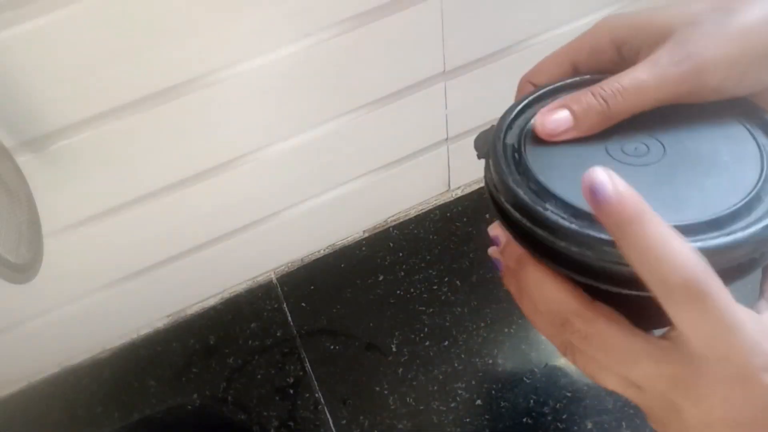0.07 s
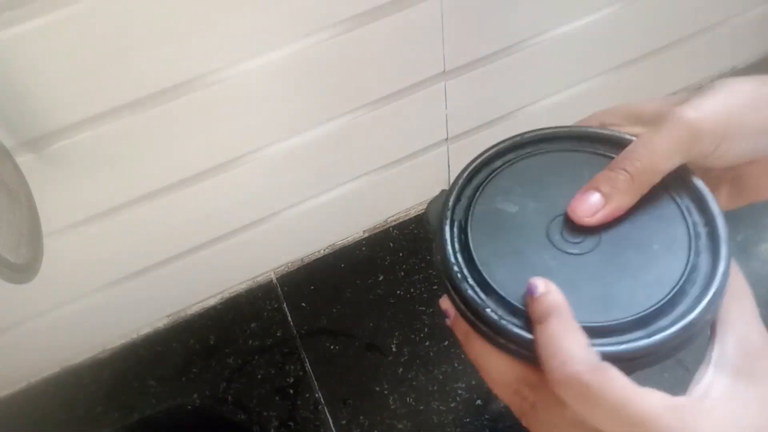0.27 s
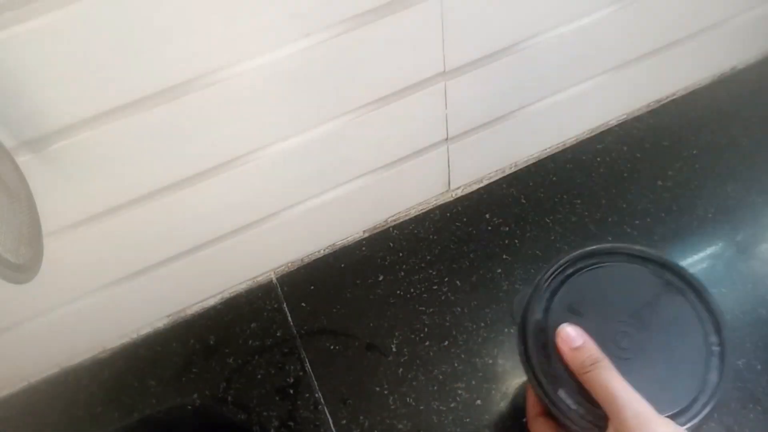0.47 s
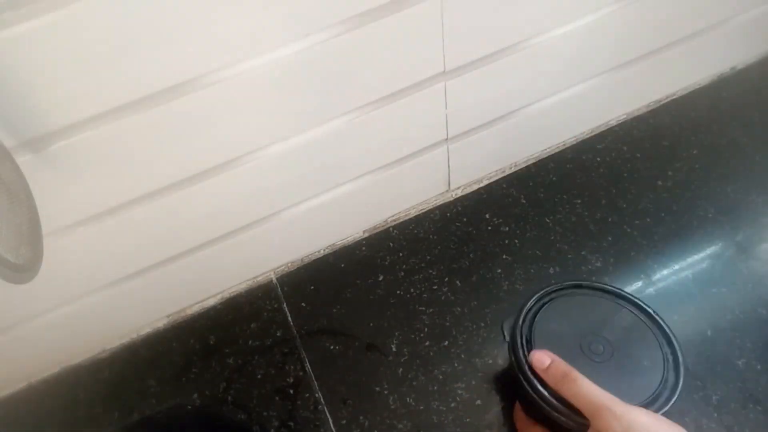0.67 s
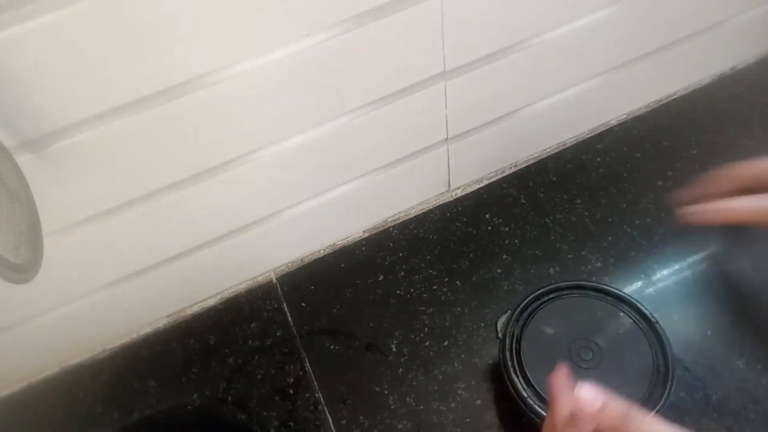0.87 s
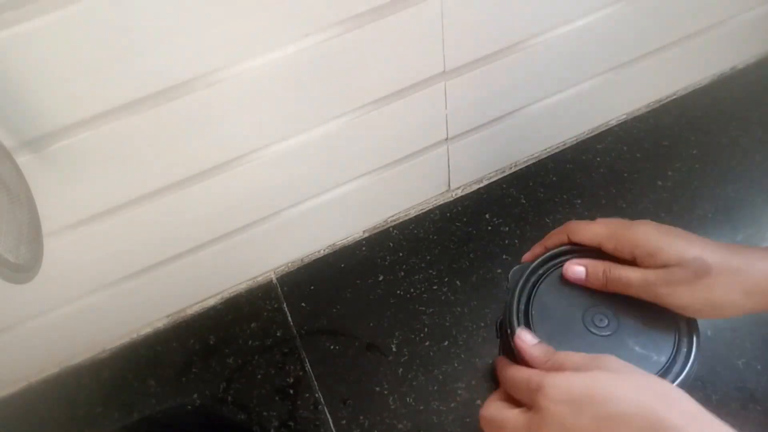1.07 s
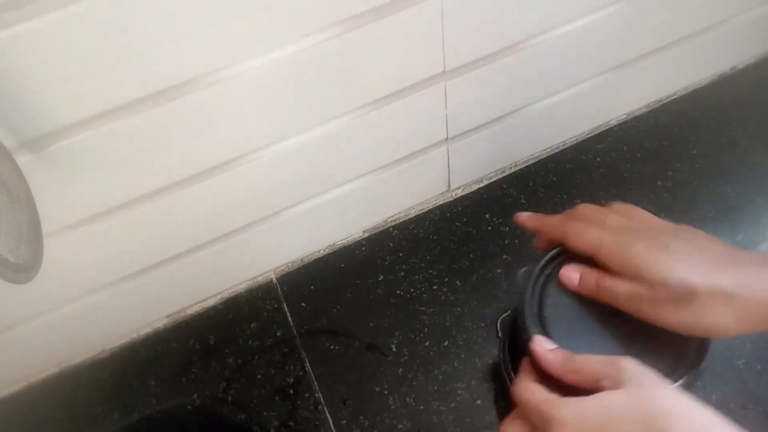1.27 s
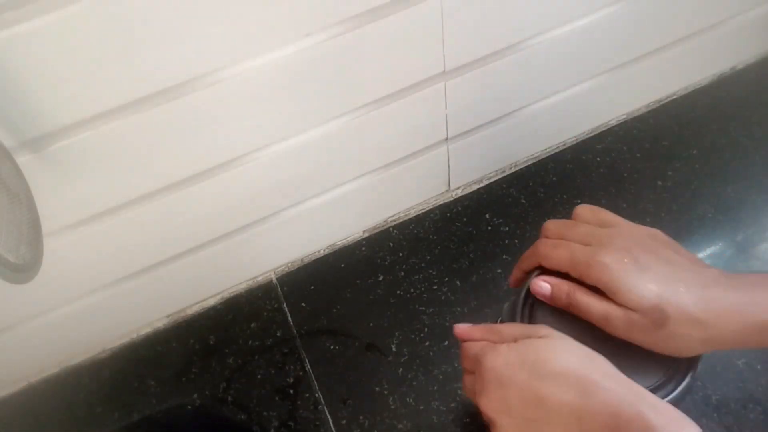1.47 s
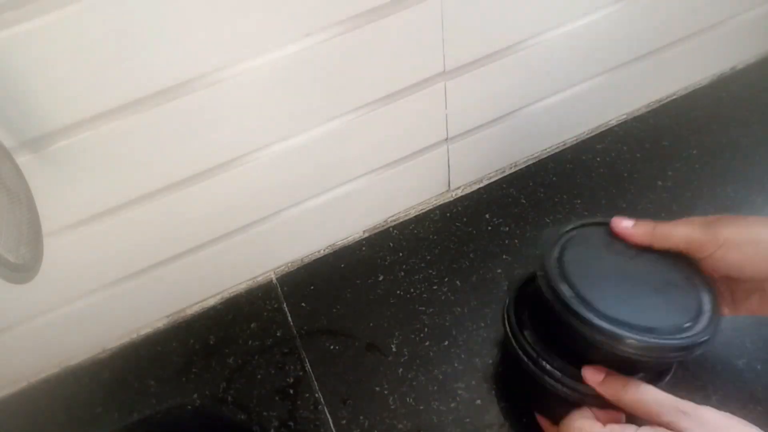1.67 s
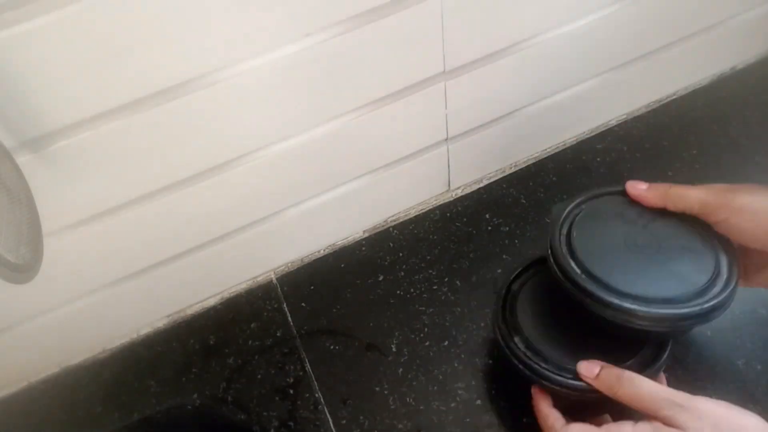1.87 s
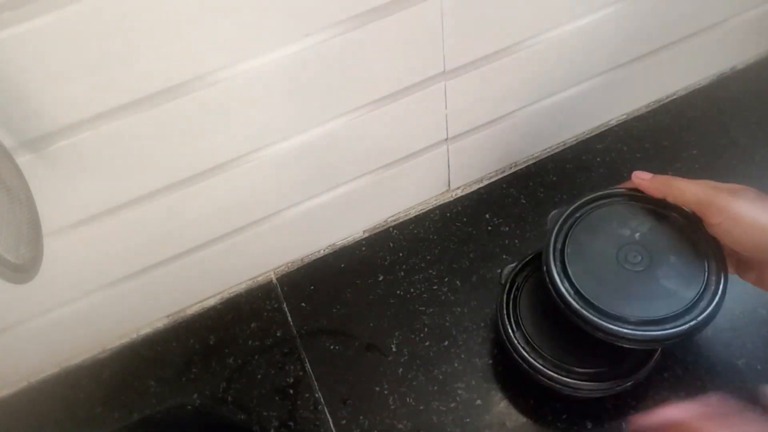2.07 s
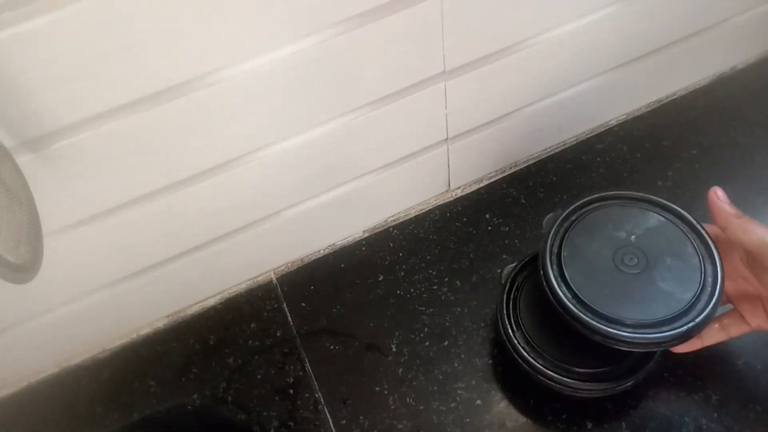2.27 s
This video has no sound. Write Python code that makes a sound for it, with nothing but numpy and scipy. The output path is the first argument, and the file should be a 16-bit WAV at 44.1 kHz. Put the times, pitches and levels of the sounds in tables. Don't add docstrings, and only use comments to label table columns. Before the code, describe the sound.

Hollow plastic container clacks and thuds on a hard counter while hands press its lid shut

```python
import sys
import numpy as np
from scipy import signal
from scipy.io import wavfile

SR = 44100
rng = np.random.default_rng(int(sys.argv[2]) if len(sys.argv) > 2 else 0)


def elevation(decibels):
    levels = np.asarray(decibels, float)
    return 10 ** (levels / 20)


def master(y):
    cut = np.clip(np.atleast_2d(y).T, -1, 1)
    pcm = np.round(cut * 32767)
    wavfile.write(sys.argv[1], SR, pcm.astype(np.int16))


N = 101518

# time in seconds, level in dB.
RUMBLE_LEVEL = [
    (0, -51.5),
    (.8, -54.5),
    (1.2, -51),
    (1.5, -62.5),
    (2.3, -62.5),
]
# time in seconds, rustle level in dB.
HAND_LEVEL = [(0, -47), (.2, -55), (.4, -54.5), (.6, -54), (.9, -51), (1.1, -52.5), (1.3, -49), (1.36, -59),
              (1.45, -51.5), (1.7, -54), (1.77, -64), (1.82, -61), (1.87, -56), (2.02, -52.5), (2.2, -57),
              (2.3, -59.5)]
# frequency in Hz, level in dB.
RUSTLE_SPECTRUM = [(200, -1.5), (400, -1.5), (1300, -10.5), (3500, -16), (7000, -21.5), (9300, -15),
                   (11000, -25), (16000, -33)]
RING_A, RING_B, RING_C, RING_D, RING_E = 6880, 7420, 8010, 9230, 11650
# start in seconds, ring mode in Hz, level in dB.
BANGLE_TOUCHES = [(1.53, RING_C, -46), (1.681, RING_A, -45.5), (1.68, RING_B, -47), (1.69, RING_E, -54),
                  (1.709, RING_A, -52.5), (1.791, RING_A, -51), (1.81, RING_C, -50), (1.82, RING_A, -56),
                  (1.97, RING_C, -42), (1.995, RING_C, -46.5), (2.063, RING_B, -46), (2.063, RING_A, -44),
                  (2.068, RING_E, -51), (2.085, RING_C, -45.5), (2.14, RING_A, -40), (2.15, RING_C, -42),
                  (2.165, RING_A, -49), (2.171, RING_C, -47), (2.199, RING_B, -42), (2.216, RING_B, -37),
                  (2.225, RING_A, -45), (2.235, RING_D, -61), (2.251, RING_B, -43), (2.25, RING_A, -47),
                  (2.26, RING_D, -46.5), (2.29, RING_C, -40)]
# time in seconds, cavity pitch in Hz, level in dB.
ROCKING_PATH = [
    (2.02, 451, -86),
    (2.045, 499, -47.5),
    (2.09, 520.6, -37),
    (2.13, 428, -43),
    (2.15, 440, -50),
    (2.185, 514.8, -43.5),
    (2.235, 475, -71),
    (2.27, 420, -41.5),
    (2.3, 508, -36.5),
]
# start in seconds, length in seconds, resonance in Hz, width in Hz,
# level in dB.
RUB_EVENTS = [(0.213, 0.063, 801, 30, -46), (0.214, 0.06, 7100, 200, -69), (.51, 0.062, 9300, 300, -66),
              (0.493, 0.11, 4630, 300, -60), (0.575, 0.05, 810, 154, -50.5), (0.756, 0.036, 570, 60, -40),
              (0.928, 0.11, 4750, 400, -51.5), (1.047, 0.26, 4530, 493, -54), (1.421, 0.063, 464, 70, -45),
              (1.596, 0.13, 322, 70, -49.5), (2.280, 0.011, 1721, 199.9, -45),
              (2.281, 0.0096, 8500, 300, -36.5)]
# start in seconds, length in seconds, shell level in dB,
# body level in dB, brightest pitch in Hz.
RIM_SLIDES = [(.11, 0.053, -59.5, -52.5, 3750), (.742, 0.027, -50.5, -47, 3640),
              (.917, .042, -40.5, -34.5, 2920), (.988, 0.037, -45.5, -45.5, 1820),
              (1.0, .022, -54, -62, 4500), (.29, 0.037, -69.5, -80, 7900), (.385, .04, -68, -80, 7900),
              (1.31, 0.043, -63.5, -83, 6400), (1.46, .04, -65.5, -67, 1600),
              (1.50, 0.065, -62.5, -75, 8000), (1.665, 0.032, -63.5, -69, 6040),
              (1.965, 0.034, -57.5, -61.5, 5100), (2.055, 0.039, -59.5, -64, 8100),
              (2.125, 0.047, -51.5, -86, 8600), (2.22, 0.054, -54.5, -77, 11000)]
# start in seconds, #
# length in seconds, shell level in dB, body level in dB, brightest pitch in Hz.
BLOW_CHATTER = [(.0245, 0.0075, -50, -47, 2500), (.030, 0.018, -50.5, -47, 4540),
                (.629, 0.022, -40.5, -38.5, 3500), (.720, 0.039, -55.5, -81, 6660),
                (1.072, 0.01, -55.5, -93, 6600), (1.385, 0.034, -41, -46, 2100),
                (1.388, .03, -55, -80, 10000), (1.607, 0.037, -50, -66, 6000),
                (1.786, 0.027, -61, -72, 7300), (1.900, 0.028, -45.5, -55, 5050),
                (1.934, 0.013, -47, -36, 8100), (2.283, 0.034, -40, -59, 8150)]
# frequency in Hz, level in dB, decay time t60 in seconds.
BODY_MODES = [
    (210, -2.5, 0.053),
    (295, -1.5, 0.059),
    (420, 0.5, 0.036),
    (530, -1.5, 0.022),
    (770, -8, 0.022),
]
# frequency in Hz, level in dB.
SHELL_MODES = [(830, -5), (1090, 10), (1380, 4), (1710, 3), (2030, 1.5), (2450, -1.5), (3000, -3),
               (3520, 1), (4050, 2), (4800, 2.5), (5400, 3.5), (6700, 1), (8600, 7), (9700, 6)]
# start in seconds, frequency in Hz, level in dB, decay scale in
# seconds (60 dB down at 0.6 of it).
WALL_PINGS = [(.0296, 5360, -22, .014), (.0296, 4450, -25, .014), (.0296, 2810, -29, 0.018),
              (.0296, 1730, -27, .016), (.0298, 760, -18, .02), (.0311, 9050, -35, .016),
              (.6287, 1145, -19, .028), (.6287, 3910, -23, .025), (.6287, 6050, -25, .007),
              (.6341, 3425, -27, .065), (.6381, 2335, -25, .035), (.6371, 1060, -23, .045),
              (.6311, 8560, -33, .045), (.6341, 1560, -25, .018), (.7485, 1300, -30, .03),
              (.7600, 570, -31, .12), (.9311, 9010, -27, .011), (.9311, 5510, -31, .009),
              (.9353, 5400, -21, .007), (.9353, 9010, -28, .009), (.9426, 9210, -34, .011),
              (.9381, 498, -23, .055), (1.0091, 5810, -33, .009), (1.0091, 3710, -33, .009),
              (1.0127, 7310, -33, .009), (1.0121, 512, -27, .065), (1.0041, 1032, -33, .065),
              (1.0031, 750, -33, .055), (1.3851, 4110, -32, .022), (1.3941, 9450, -38, .065),
              (1.3921, 3145, -39, .045), (1.3951, 1366, -33, .055), (1.3941, 836, -35, .055),
              (1.8997, 3630, -22, .028), (1.8997, 5255, -30, .035), (1.9091, 2457, -29, .07),
              (1.9081, 1072, -26, .065), (1.9041, 3545, -27, .045), (1.9338, 7810, -23, .009),
              (1.9338, 9810, -26, .013), (1.9338, 11400, -29, .009), (1.9338, 3710, -26, .016),
              (1.9343, 605, -14, .027), (1.9361, 1105, -31, .042), (1.6091, 2110, -45, .045),
              (1.6091, 1055, -45, .042), (1.0721, 2055, -41, .032)]
# start in seconds, thump level in dB, thump pitch in Hz, thump t60 in
# seconds, crack level in dB.
BODY_KNOCKS = [(.0302, -5, 552, 0.036, -20), (.364, -26.5, 145, 0.02, -56), (.378, -38, 295, 0.15, -60),
               (.6287, -25.5, 208, 0.16, -12), (.6292, -4, 295, 0.061, -27), (.638, -20.5, 329, 0.051, -39),
               (.7475, -10.5, 360, 0.018, -28), (.7565, -8.5, 343, 0.018, -50),
               (.9352, -23, 215, 0.06, -11.5), (1.0126, -22, 395, 0.033, -20.5),
               (1.0722, -39.5, 295, 0.047, -43), (1.167, -30.5, 272, 0.029, -44),
               (1.2585, -27, 232, 0.037, -36), (1.392, -18, 203, 0.093, -32),
               (1.553, -23.5, 239, 0.047, -45), (1.688, -27, 279, 0.043, -42),
               (1.7865, -49, 355, 0.061, -41), (1.862, -41, 300, 0.31, -72), (1.9000, -16, 420, .12, -20),
               (1.9010, -21.5, 210, 0.19, -50), (1.9115, -8.5, 429, 0.046, -33),
               (1.9337, 1, 287, 0.021, -14.5), (1.945, -13, 520, 0.018, -32),
               (2.2830, -29.5, 458, 0.092, -39.5), (2.252, -70, 400, .02, -38), (.629, -23.5, 85, .1, -72),
               (.93, -21.5, 114, 0.11, -70), (1.388, -22, 100, 0.11, -70)]

SHELL_T60_S, SHELL_DAMPING = 0.011, 0.75
COLOUR_DB_PER_OCT, MODE_SPREAD_DB = 7.5, 2.5
AIR_DB, AIR_REACH = -6.5, 3.0


def rms_one(x):
    return x / np.sqrt(np.mean(x ** 2) + 1e-20)


def in_time(rows):
    s, *columns = np.transpose(rows)
    return [np.interp(np.arange(N) / SR, s, column) for column in columns]


def drift(rate_hz):
    r = np.exp(-80 * np.pi * rate_hz / SR)
    slow = signal.lfilter([1], [1, -2 * r, r * r], rng.standard_normal(N // 40 + 2002))
    slow = slow[2000:]
    return np.interp(np.arange(N) / 40, np.arange(len(slow)), rms_one(slow))


def ring(clicks, hz, t60):
    r, w = elevation(-60 / (t60 * SR)), 2 * np.pi * hz / SR
    return signal.lfilter([0, np.sin(w)], [1, -2 * r * np.cos(w), r * r], clicks + 1e-18)


def add(out, s, piece):
    i = int(s * SR)
    out[i:i + len(piece)] += piece[:N - i]


def rumble():
    sos = signal.butter(2, [70, 163], "band", fs=SR, output="sos")
    band = signal.sosfilt(sos, rng.standard_normal(N))
    return rms_one(band) * elevation(in_time(RUMBLE_LEVEL)[0] + 2.0 * drift(2.7))


def rustle():
    out, patchy_db = 0, 1.2
    together = drift(6)
    edges = 200 * 2 ** np.arange(0, 6.5, .25)
    white = rng.standard_normal((2, N))
    hz, db = np.transpose(RUSTLE_SPECTRUM)
    for k, (low, high) in enumerate(zip(edges, edges[1:])):
        sos = signal.butter(2, [low, high], "band", fs=SR, output="sos")
        band = signal.sosfilt(sos, white[k % 2])
        level = np.interp(np.log(low * high) / 2, np.log(hz), db)
        out = out + band * elevation(level + patchy_db * (together + 0.78 * drift(16.0)))
    return rms_one(out) * elevation(in_time(HAND_LEVEL)[0])


def kitchen(x):
    t = np.arange(SR // 4) / SR
    tail = rng.standard_normal(len(t)) * elevation(-60 * t / .1) * (t > .004)
    return signal.fftconvolve(x, tail / np.sqrt(np.sum(tail ** 2)))[:N]


def bangles():
    beat_hz, t60, rise_s, soft_db = 70, .12, .004, -6
    out, t = np.zeros(N), np.arange(SR // 5) / SR
    luck = rng.random((30, 2))
    shake = elevation(4 * drift(90))
    for (s, hz, db), (a, b) in zip(BANGLE_TOUCHES, luck):
        cluster = 0
        for side in (-1, 0, .7):
            cluster = cluster + np.sin(2 * np.pi * ((hz + side * beat_hz * (.5 + a)) * t + side * b))
        flutter = np.roll(shake, -int(a * N))[:len(t)]
        decay = elevation(db + soft_db - 60 * t / t60)
        add(out, s, decay * cluster * flutter * np.minimum(t / rise_s, 1))
    return out


def rocking():
    hz, db = in_time(ROCKING_PATH)
    r = np.exp(-2 * np.pi * 60 / SR)
    slow = signal.lfilter([1], [1, -2 * r, r * r], rng.standard_normal((2, N)))
    carrier = np.exp(2j * np.pi * np.cumsum(hz) / SR)
    tone = np.real((slow[0] + 1j * slow[1]) * carrier)
    return rms_one(tone) * elevation(db) * (np.arange(N) > ROCKING_PATH[0][0] * SR)


def rubs():
    out, white = np.zeros(N), rng.standard_normal(N)
    for s, length, hz, width_hz, db in RUB_EVENTS:
        t = np.arange(int(length * SR)) / SR / length
        friction = white[int(s * SR):][:len(t)]
        tone = ring(ring(friction, hz, 2 / width_hz), hz, 1 / width_hz)
        add(out, s, elevation(db) * rms_one(tone) * np.sin(np.pi * t) ** .5)
    return out


def shell(force, luck, bright_hz):
    click = elevation(AIR_DB) * np.diff(force, prepend=0) * np.sqrt(bright_hz / 3000)
    out = signal.lfilter(*signal.butter(2, min(AIR_REACH * bright_hz, .45 * SR), fs=SR), click)
    for k, (hz, db) in enumerate(SHELL_MODES):
        colour_db = -COLOUR_DB_PER_OCT * abs(np.log2(hz / bright_hz))
        gain = elevation(db + MODE_SPREAD_DB * luck[k] + colour_db) * np.sqrt(hz / 27000)
        t60 = SHELL_T60_S * (1000 / hz) ** SHELL_DAMPING
        out = out + (-1) ** k * gain * ring(force, hz, t60)
    return out


def scuffs(rows, sudden):
    grains_per_s, spread_db = 4000, 1.5
    out = np.zeros(N)
    luck = rng.standard_normal((30, 14))
    slips = rng.random(N) < grains_per_s / SR
    heights = elevation(spread_db * np.minimum(rng.exponential(1, N), 4))
    grains = slips * heights * rng.choice([-1, 1], N)
    for k, (s, length, shell_db, body_db, bright_hz) in enumerate(rows):
        start = int(s * SR)
        t = np.arange(min(int((2 * length + 0.036) * SR), N - start)) / SR / length
        stroke = np.exp(-2 * t ** 2) if sudden else np.sin(np.pi * np.minimum(t, 1)) ** 2
        force = grains[start:][:len(t)] * stroke
        scale = np.sqrt(len(t) / SR / length)
        walls = rms_one(shell(force, luck[k], bright_hz))
        body = rms_one(sum(elevation(db) * ring(force, hz, t60) for hz, db, t60 in BODY_MODES))
        add(out, s, scale * (elevation(shell_db) * walls + elevation(body_db) * body))
    return out


def pings():
    grip_reach, grip_power = .6, 1.6
    out, t = np.zeros(N), np.arange(SR // 8) / SR
    flutter_db = 3 * np.tanh(drift(140))
    skips = rng.integers(0, N - len(t), 60)
    for (s, hz, db, t60), skip in zip(WALL_PINGS, skips):
        loss_db = 60 * (t / t60 / grip_reach) ** grip_power
        add(out, s, elevation(db - loss_db + flutter_db[skip:skip + len(t)]) * np.sin(2 * np.pi * hz * t))
    return out


def knocks():
    crack_s, attack_cycles = .0004, 0.2
    out, t = np.zeros(N), np.arange(SR // 5) / SR
    luck, burst = rng.standard_normal((30, 14)), rng.standard_normal((30, SR // 5))
    for k, (s, thump_db, hz, t60, crack_db) in enumerate(BODY_KNOCKS):
        attack = 1 - np.exp(-t * hz / attack_cycles)
        thump = np.sin(2 * np.pi * hz * t) * elevation(-60 * t / t60) * attack
        force = (0.45 * burst[k] - np.cos(t / crack_s * 2)) * np.exp(-t / crack_s)
        crack = shell(force, luck[k], bright_hz=4000)
        add(out, s, elevation(thump_db) * thump + elevation(crack_db) * crack / np.max(np.abs(crack)))
    return out


def scene():
    contacts = scuffs(BLOW_CHATTER, sudden=True) + scuffs(RIM_SLIDES, sudden=False) + rubs()
    box = knocks() + pings() + contacts + rocking() + bangles()
    box = signal.sosfilt(signal.butter(2, 178, "high", fs=SR, output="sos"), box)
    return (box + elevation(-24) * kitchen(box) + rumble() + rustle())[None]


def band_limit(x):
    return signal.sosfilt(signal.butter(12, 16520, fs=SR, output="sos"), x)


def record(dry):
    peak_hz, peak_width_hz, peak_gain = 9300, 700, 0.34
    thin = signal.sosfilt(signal.butter(2, 60, "high", fs=SR, output="sos"), dry)
    peak = signal.lfilter(*signal.iirpeak(peak_hz, peak_hz / peak_width_hz, fs=SR), thin)
    top_cut = signal.cheby2(12, 70, 16500, fs=SR, output="sos")
    mix = signal.sosfilt(top_cut, thin + peak_gain * peak)
    return band_limit(mix)


dry = scene()
out = record(dry)
master(out)
```